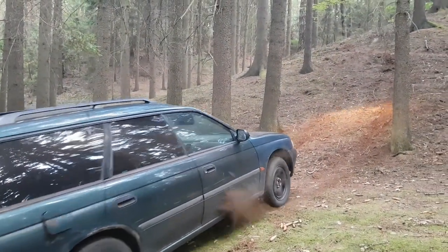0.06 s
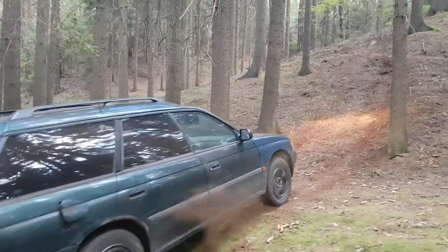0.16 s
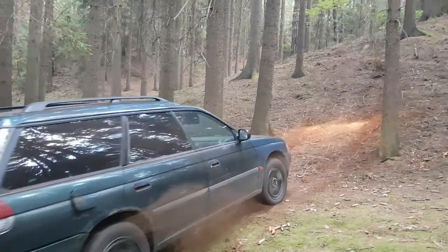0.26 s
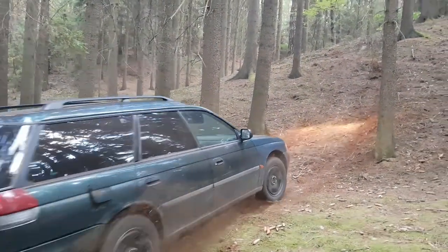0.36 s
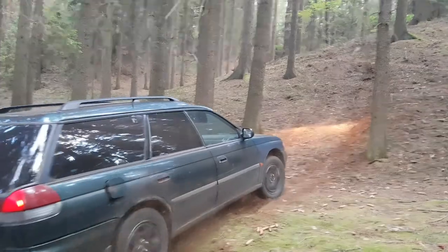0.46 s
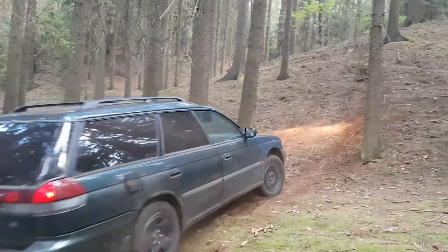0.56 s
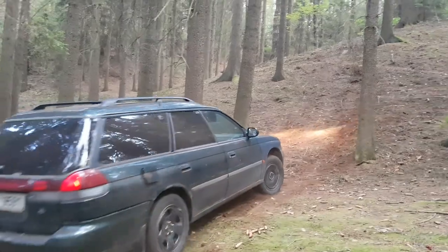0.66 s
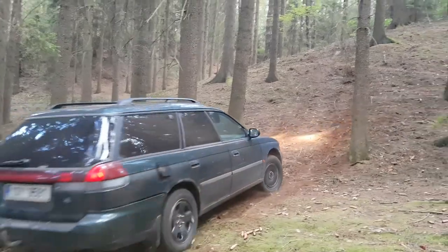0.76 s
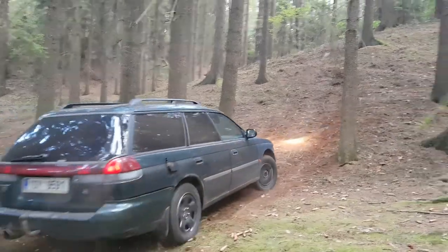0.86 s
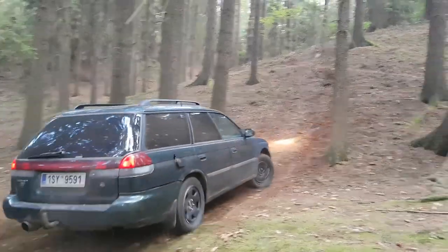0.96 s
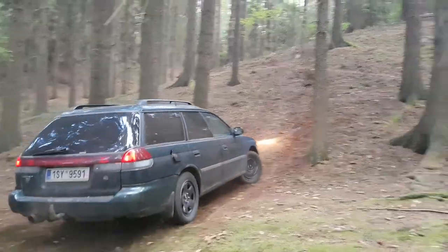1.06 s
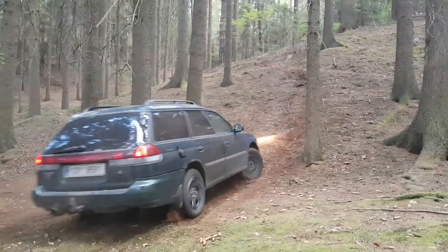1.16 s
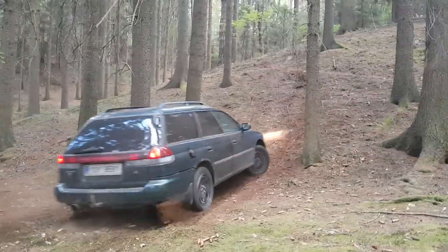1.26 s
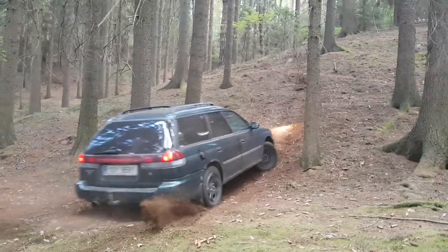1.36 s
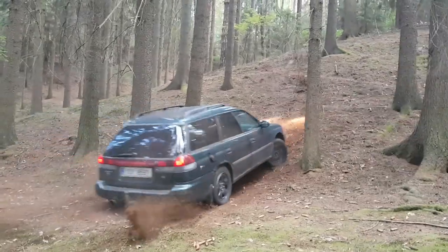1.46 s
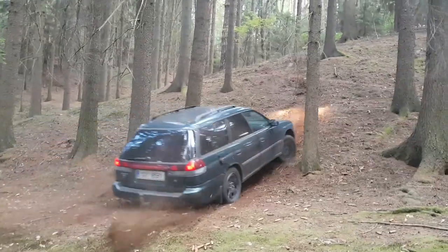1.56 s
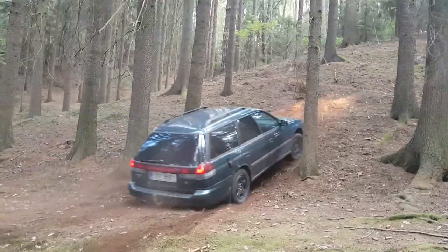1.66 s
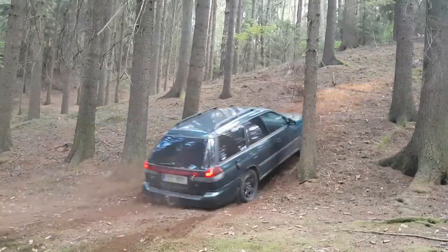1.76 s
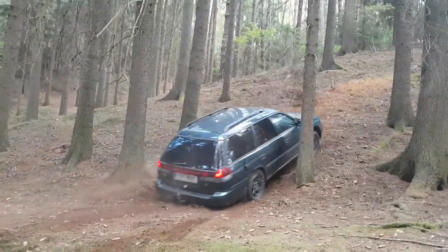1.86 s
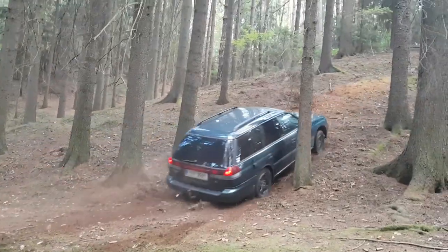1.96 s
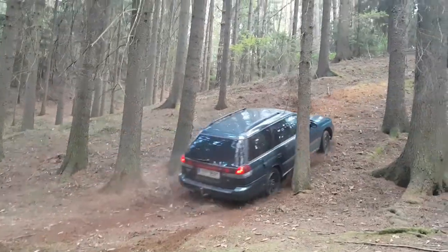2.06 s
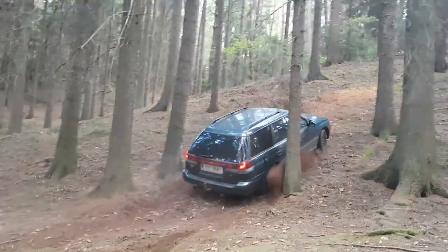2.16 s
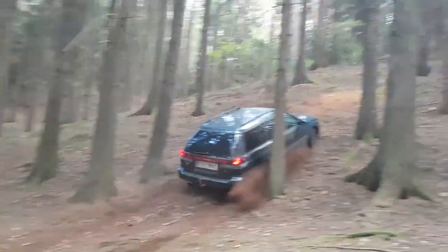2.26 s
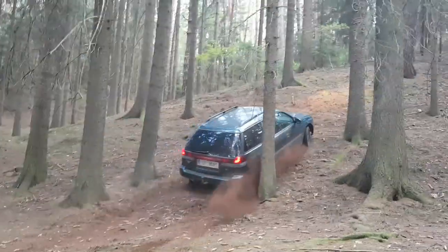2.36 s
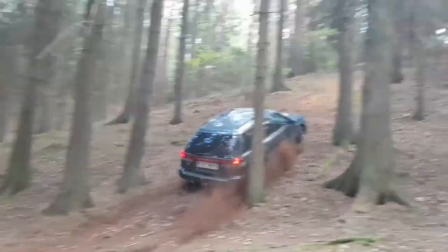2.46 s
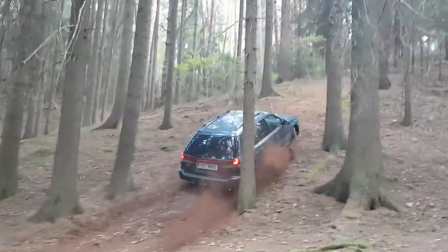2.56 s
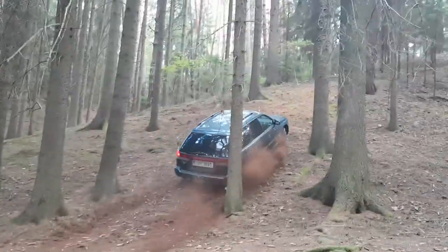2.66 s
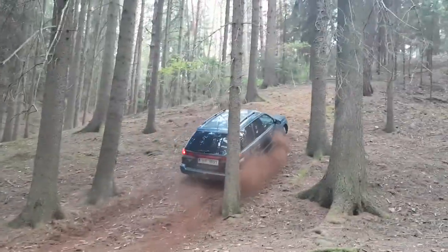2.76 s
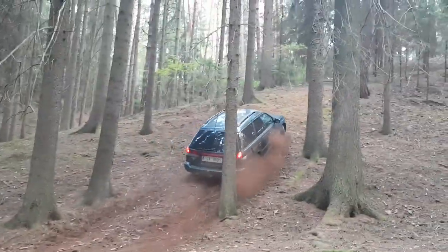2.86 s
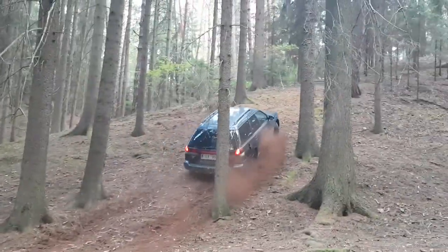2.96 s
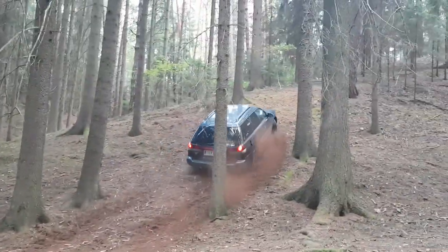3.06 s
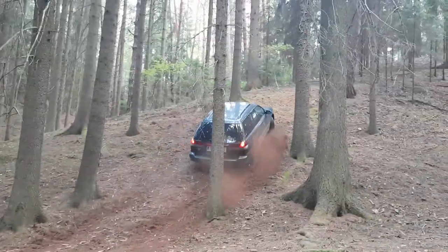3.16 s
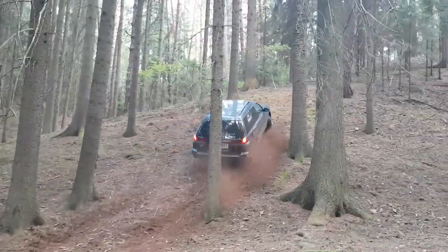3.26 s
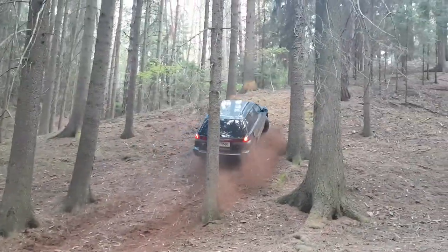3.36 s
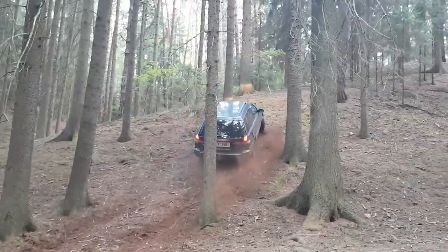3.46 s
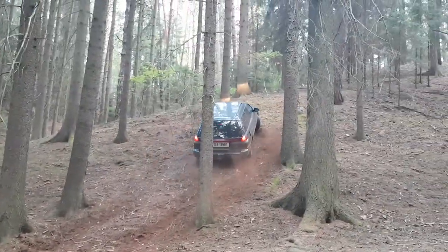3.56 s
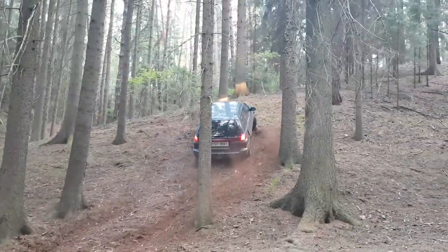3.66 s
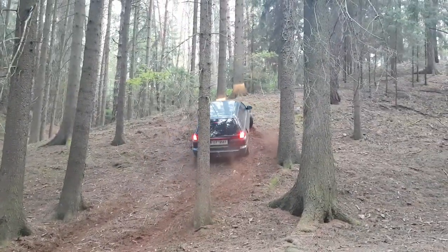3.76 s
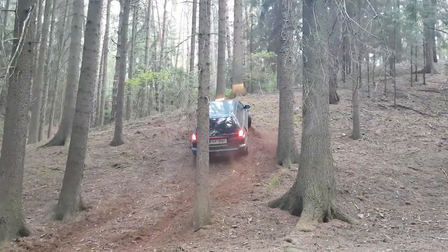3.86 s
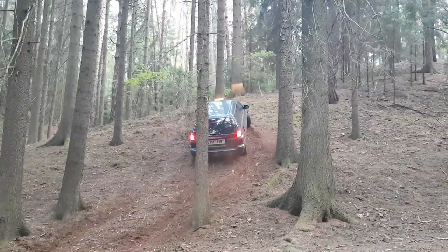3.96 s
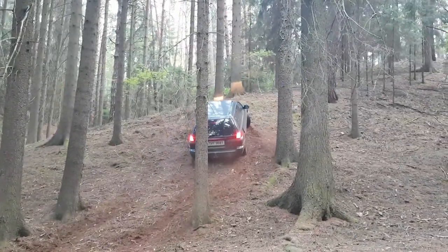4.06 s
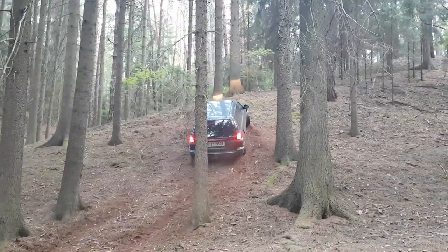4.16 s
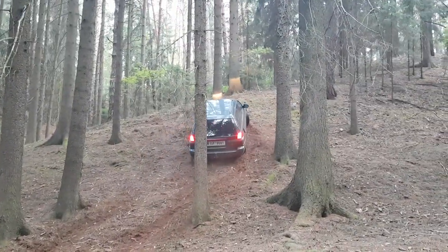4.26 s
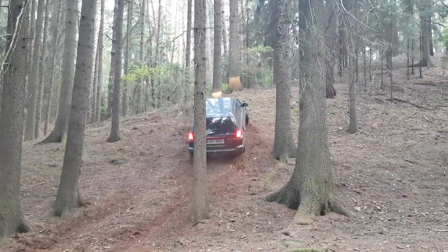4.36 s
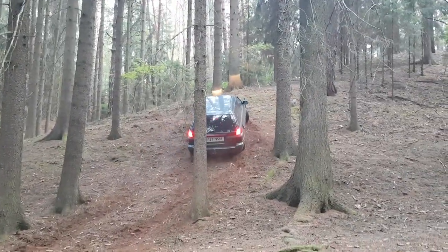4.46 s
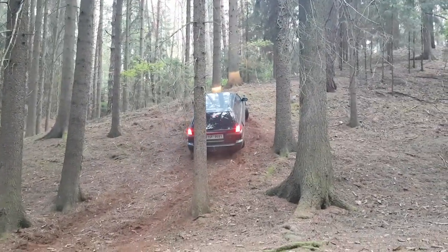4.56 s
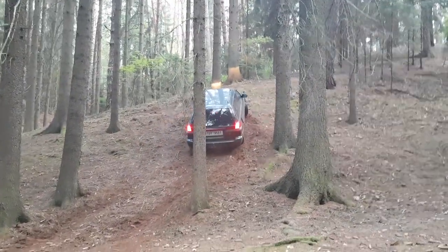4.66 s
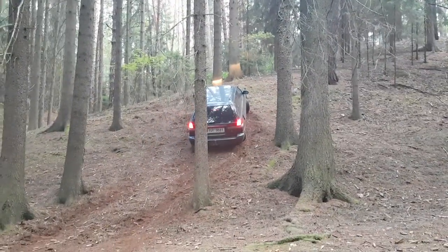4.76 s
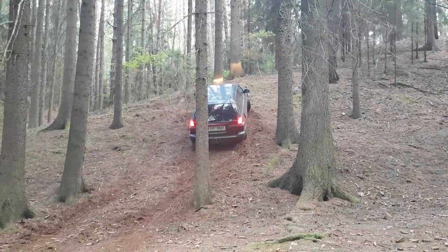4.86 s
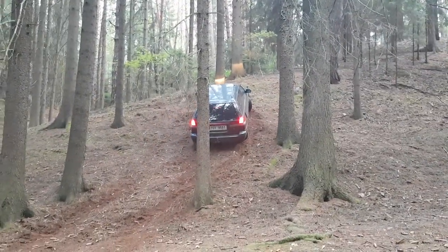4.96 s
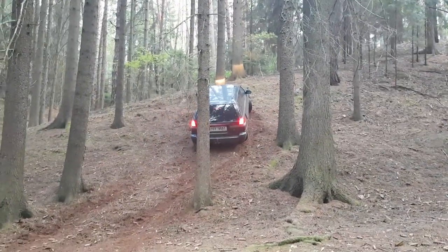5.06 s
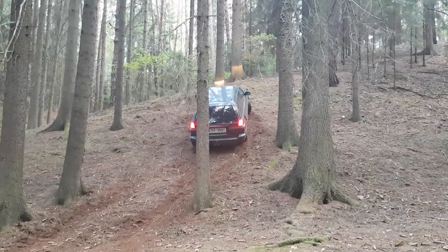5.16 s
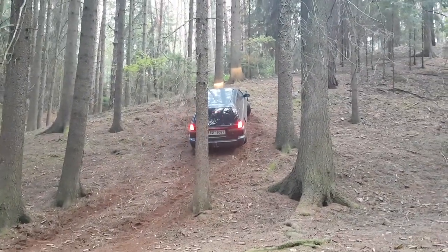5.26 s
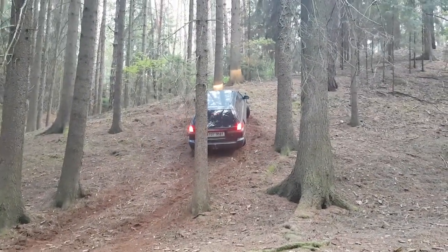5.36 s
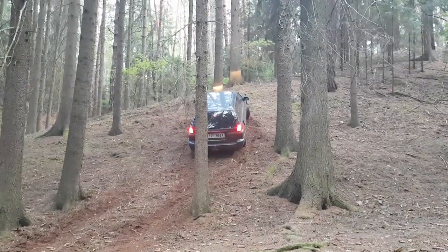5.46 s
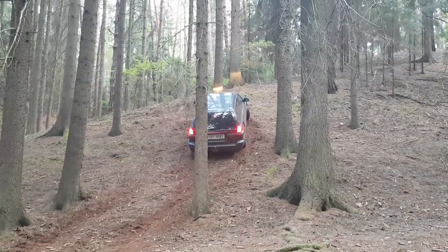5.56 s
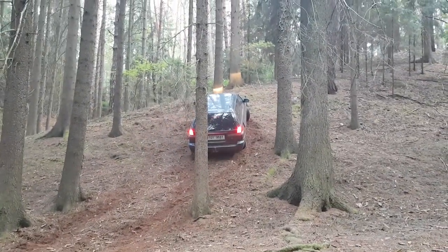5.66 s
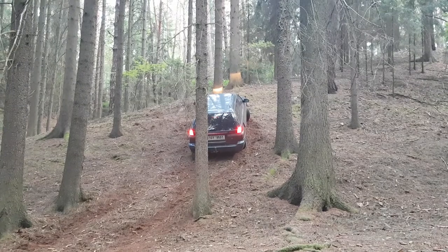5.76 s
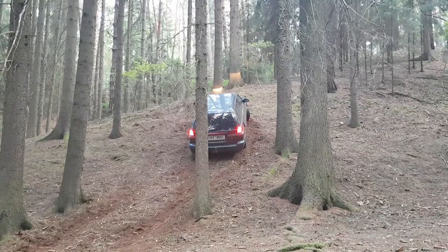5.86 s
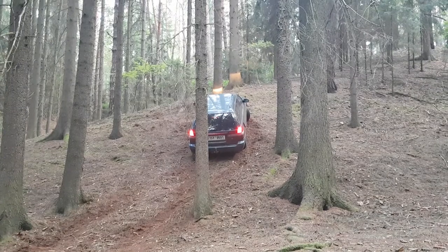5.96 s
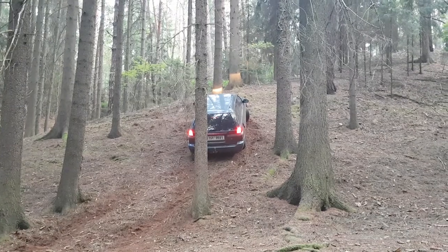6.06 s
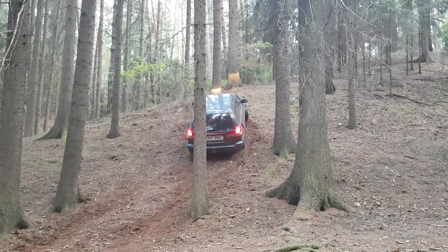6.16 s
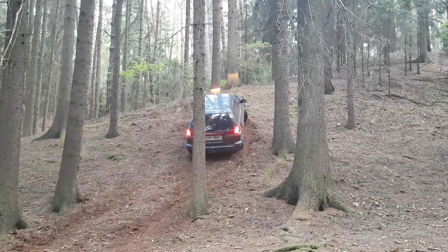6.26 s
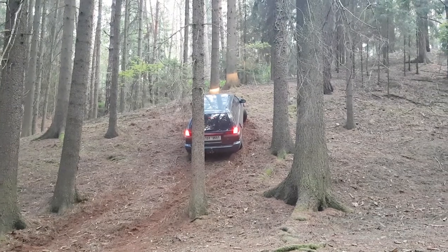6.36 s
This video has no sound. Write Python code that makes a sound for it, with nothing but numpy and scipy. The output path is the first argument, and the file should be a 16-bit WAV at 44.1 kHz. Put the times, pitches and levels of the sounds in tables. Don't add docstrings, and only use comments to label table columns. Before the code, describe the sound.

A car engine roars under load while wheels spray soil and leaves, then cuts throttle, burbles and pops down to a ragged idle in woodland.

```python
import sys
import numpy as np
from scipy import signal
from scipy.fft import rfft, irfft
from scipy.io import wavfile
from scipy.ndimage import uniform_filter1d, minimum_filter1d, map_coordinates

SR = 44100
rng = np.random.default_rng(int(sys.argv[2]) if len(sys.argv) > 2 else 0)


def volts_from_db(level):
    exponent = np.asarray(level, float) / 20
    return 10 ** exponent


def log_audio(samples):
    frames = np.atleast_2d(samples).T
    limited = np.clip(frames, -1, 1)
    pcm = np.round(limited * 32767).astype(np.int16)
    wavfile.write(sys.argv[1], SR, pcm)


N = 282681
T = np.arange(N) / SR

LIFT_S, POPS_FROM_S, DECLUTCH_S = 3.24, 3.915, 5.5
SWITCH_S = .035

# frequency in Hz, level in dB per Hz.
HISS = [(1760, -32), (3000, -1), (3900, -6.5), (5920, -10.5), (8130, -13.5), (9070, -16), (12600, -7.5),
        (15500, -10)]
# time in seconds, pitch in Hz, level in dB.
BIRD = [(6.2, 7200, -85), (6.22, 7230, -78), (6.28, 7420, -75), (6.33, 7300, -77), (6.37, 7200, -85)]
# time in seconds, level in dB, rise in seconds, fall in seconds.
TWIG = (3.6198, -12, .00007, .0012)
# time in seconds, pitch in Hz, level in dB.
SQUEAL = [(5.5, 1745, -85), (5.52, 1730, -64), (5.6, 1690, -64), (5.66, 1655, -67), (5.7, 1650, -85),
          (5.88, 1760, -85), (5.92, 1780, -68), (5.97, 1790, -85)]
# time in seconds, peak in dB, ring in Hz, 60 dB decay in seconds.
STONES = [
    (3.6199, -36, 13000, .001),
    (3.995, -30, 1150, .025),
    (3.995, -33, 2550, .022),
    (3.997, -38, 1900, .015),
    (4.008, -39, 2800, .02),
    (4.035, -38, 900, .02),
    (4.097, -46, 1750, .03),
    (4.097, -42, 1100, .02),
    (4.18, -38, 12000, .001),
    (4.535, -40, 2200, .015),
]

# time in seconds, spray level in dB, fineness of the thrown soil in dB.
WHEELS = [(0, -31.5, -1), (.08, -30.5, -0.5), (.45, -25.5, -1), (.95, -25.5, 2.5), (1.4, -25, -1.5),
          (1.6, -27.5, 5.5), (1.81, -30.5, 5), (2.02, -25.5, 3.5), (2.25, -25, -0.5), (2.55, -26.5, 1.5),
          (2.75, -28, 1.5), (3.05, -31, 2), (3.26, -37, -2), (3.55, -48.5, -0.5), (4.2, -53, -1.5),
          (5.0, -55.5, -2), (5.6, -66, -4.5), (6.41, -67.5, -0.5)]
# time in seconds, change in dB, length in
# seconds.
GRIPS = [
    (.7, -0.5, .03),
    (1.27, -3, 0.035),
    (1.42, 0, 0.038),
    (1.5, -1, .02),
    (2.07, 2.5, .07),
    (2.64, -9, .045),
    (3.13, 0, 0.025),
]
# time in seconds, change in dB, length in seconds.
TOSSES = [
    (.3, 2.5, .03),
    (1.1, 2.5, .05),
    (1.36, 1.5, .03),
    (3.42, 5.5, .02),
    (3.48, 5, .02),
    (3.77, 5, .03),
    (4.12, 7, 0.023),
    (4.18, 4.5, .02),
]
# frequency in Hz, level in dB per Hz.
SPRAY = [(530, -31), (900, -7.5), (1040, 5), (1100, -2), (1260, -3.5), (1670, -3.5), (2250, -7),
         (2510, -8.5), (2860, -9.5), (3630, -17), (5570, -22.5), (7870, -26.5), (9070, -35), (12500, -24.5),
         (15500, -32)]
# time in seconds, comb spacing in Hz.
SLOPE = [
    (2.35, 1780),
    (2.75, 1400),
    (3.0, 1220),
    (3.25, 1110),
    (6.41, 1100),
]

# frequency in Hz, level in dB.
ROAR = [(60, -39), (220, 4), (400, -11.5), (520, -8), (620, 2), (760, 3), (900, -7), (1050, -12.5),
        (1300, -11), (3000, -61)]
# frequency in Hz, level in dB.
TAILPIPE = [(60, -30.5), (250, -19.5), (340, -20), (440, -3.5), (520, -8.5), (600, 0), (670, -6.5),
            (800, -15), (1050, -15), (1300, -19.5), (3000, -57)]
# time in seconds, change in dB, length in seconds.
GULPS = [
    (.4, 5, 0.13),
    (.84, 5.5, 0.08),
    (1.08, 4.5, .15),
    (2.05, -3.5, 0.13),
    (2.35, 1, 0.071),
    (2.95, 3, 0.13),
]

# time in seconds, peak in dB, thump above the peak in dB.
POPS = [(3.262, -25, 24), (3.282, -23.5, 11), (3.912, -23, 17), (3.932, -29.5, 13), (3.957, -34, 14),
        (4.025, -33, 19), (4.045, -31.5, 13), (4.092, -23, 17.5), (4.155, -37.5, -3), (4.244, -34, 12.5),
        (4.273, -41, 8.5), (4.529, -23, 16.5), (4.545, -28, 12.5), (4.623, -38.5, 22), (4.801, -35, 12)]
# frequency in Hz, level in dB, 60 dB decay in seconds.
POP_MODES = [(609, 2, 0.043), (446, -8, .06), (1090, -21.5, 0.022)]
# frequency in Hz, level in dB, 60 dB decay in seconds.
THUMP_MODES = [(146.6, 4.5, 0.074), (97.2, -3.5, 0.21), (210, -4.5, 0.096)]

# time in seconds, firing rate in Hz.
CLIMB = [(0.0, 159.8), (0.4, 178.8), (0.59, 177.5), (0.9, 185.6), (1.5, 181.9), (1.96, 202.9), (2.1, 203.3),
         (2.46, 192.9), (2.67, 184.3), (3.22, 173.3)]
# time in seconds, firing rate in Hz.
COAST = [(3.26, 158.5), (3.38, 148), (3.59, 114.3), (3.93, 98.15), (4.66, 73.34), (5.48, 40.47),
         (5.85, 34.87), (6.41, 23.5)]
# multiple of the four-firing cycle, level in dB.
BEAT = [(1, -55), (2, -22), (3, -8), (4, -0.5), (5, -28.5), (6, -20.5), (7, -23.5), (8, -16), (9, -34),
        (10, -28), (11, -29), (12, -28.5), (13, -37.5), (14, -36), (15, -31), (16, -25), (17, -43),
        (18, -27), (19, -33), (20, -23.5), (24, -32)]
# multiple, time in seconds, change in dB, length in seconds.
SINGING = [(6, .65, 5, .15), (8, 0, 6, .05), (8, 1.9, 2, .25), (8, 2.4, -4, .15), (12, .12, 6, .1),
           (12, .58, 6, .06), (12, 1.55, 9, .15), (12, 1.95, 11, .17), (12, 2.5, -6, .2), (16, 1.0, 8, .2),
           (16, 3.15, 12, .08), (16, .3, -6, .3), (16, 2, -6, .4), (20, .1, 4, .25), (20, 1.9, -8, .6),
           (24, .33, 12, .1)]
# time in seconds, change in dB, length in seconds.
SURGES = [
    (0, 1.5, 0.035),
    (.4, -1, .06),
    (1.36, 0.5, 0.032),
    (2.6, -9.5, 0.026),
    (3.28, 3, 0.0091),
    (3.41, 1.5, 0.044),
    (3.93, -6, 0.011),
]
# time in seconds, depth in dB, length in seconds.
MISSES = [
    (2.605, -2.5, 0.011),
    (3.225, -9.5, 0.0068),
    (3.282, -19.5, 0.0044),
    (3.955, -10.5, 0.017),
    (4.117, -2.5, .01),
    (4.542, -10.5, 0.011),
    (4.836, -18.5, 0.0046),
]
# start in seconds, scatter of firing strength in dB, scatter of firing time
# from 0 to 1, level of late-burning fuel in dB.
STAGES = [
    (0, .6, .004, -40),
    (POPS_FROM_S, 1.5, .015, -11),
    (4.65, .8, .008, -27),
    (DECLUTCH_S, 2.4, .03, -15),
]
CYLINDER_DB = [2.5, 3, 0.7, -0.5]
# frequency in Hz, level in dB.
PIPE = [(15, -40), (35, -20), (46, -18), (66, -2), (90, 0), (130, -1), (143, -5), (168, -15), (192, -27),
        (230, -35), (300, -53), (440, -49), (590, -46), (800, -64), (3000, -87), (8000, -125)]
# frequency in Hz, level in dB.
BURBLE = [(40, -40), (105, -10), (135, 0), (165, -1), (215, -17), (300, -34), (380, -47), (600, -58),
          (3000, -90), (8000, -125)]
# multiple of the firing rate, level in dB.
HEADERS = [(3 / 4, -26), (3 / 2, -24), (2, -26)]

# frequency in Hz, level in dB.
SCATTER = [(60, -26), (250, -20), (600, -11), (1400, -6), (4000, -6), (8000, -3), (15000, -2)]
# time in seconds, delay in samples.
PORT_LAG = [
    (0, 14),
    (1, 8.5),
    (2.2, 1),
    (4.6, 0),
    (5.4, -2.5),
    (6.41, -2),
]
# frequency in Hz, left minus right in dB.
PORT_TILT = [(60, 1), (110, -2), (200, -1), (380, -0.5), (700, 1), (1290, 3.5), (2380, 10.5), (4400, 1.5),
             (7200, -0.5), (8000, 7.5), (8800, 3.5), (15000, 5.5)]
# time in seconds, first notch in Hz.
EDGE = [
    (0, 9730),
    (.8, 8920),
    (2.2, 5720),
    (3.2, 5400),
    (3.45, 9460),
    (6.41, 9470),
]


def curve(rows):
    s, *columns = np.transpose(rows)
    return [np.interp(T, s, c) for c in columns]


def after(s):
    return np.clip((T - s) / SWITCH_S + .5, 0, 1)


def swells(rows):
    return sum(db * np.exp(-.5 * ((T - s) / w) ** 2) for s, db, w in rows)


def walk(rate):
    k = int(SR / rate)
    held = np.repeat(rng.standard_normal(N // k + 1), k)
    return 1.3 * uniform_filter1d(uniform_filter1d(held, k), k)[:N]


def colour(x, points):
    size = 8192
    f, db = np.transpose(points)
    bins_hz = np.maximum(np.arange(size // 2 + 1) * SR / size, 1)
    cep = irfft(np.log(volts_from_db(np.interp(np.log(bins_hz), np.log(f), db))))
    cep[1:size // 2] *= 2
    cep[size // 2 + 1:] = 0
    return signal.oaconvolve(x, irfft(np.exp(rfft(cep))))[:N]


def even(x, s):
    span = int(s * SR)
    return x / np.sqrt(uniform_filter1d(uniform_filter1d(x ** 2, span), span) + 1e-12)


def band(x, lo_hz, hi_hz, order=3):
    return signal.sosfilt(signal.butter(order, [lo_hz, min(hi_hz, .45 * SR)], "band", fs=SR, output="sos"), x)


def ring(s, modes, rise_s):
    out, i = np.zeros(N), int(s * SR)
    t = T[:min(SR // 4, N - i)]
    for hz, db, t60 in modes:
        out[i:i + len(t)] += volts_from_db(db) * np.sin(2 * np.pi * hz * t) * np.exp(-np.log(1000) * t / t60)
    out[i:i + len(t)] *= 1 - np.exp(-(t / rise_s) ** 2)
    return out


def smear(x, t60):
    echo = rng.standard_normal(SR // 3) * np.exp(-np.log(1000) * T[:SR // 3] / t60)
    return signal.fftconvolve(x, echo / np.linalg.norm(echo))[:N]


def delayed(x, lag):
    return map_coordinates(x, [np.arange(N) - lag], order=3, mode="nearest")


def microphone_hiss():
    return volts_from_db(-70.5) * even(colour(rng.standard_normal(N), HISS), .5)


def whistle(rows):
    hz, db = curve(rows)
    return volts_from_db(db + 1.5 * walk(60)) * np.sin(2 * np.pi * np.cumsum(hz) / SR) * (db > -84)


def twig_snap():
    s, db, rise, fall = TWIG
    t = np.maximum(T - s, 0)
    return volts_from_db(db) * (1 - np.exp(-(t / rise) ** 2)) * np.exp(-t / fall)


def struck_stones():
    return sum(ring(s, [(hz, db, t60)], 8 / SR) for s, db, hz, t60 in STONES)


def soil_layers(throttle):
    spin_db, fine_db = curve(WHEELS)
    bite_db, toss_db = swells(GRIPS), swells(TOSSES)
    settled = 1 - np.exp(-np.maximum(T - LIFT_S, 0) / .1)
    spray_db = spin_db + bite_db
    grit_db = spin_db - 14 + fine_db + toss_db + bite_db - 2 * settled
    leaf_db = spin_db - 24 + 1.4 * fine_db + .7 * toss_db + 1.9 * bite_db - 5 * settled
    leaf_db = leaf_db - 0.7 * np.minimum(T, LIFT_S)
    clods_db = (.3 + .6 * throttle) * walk(18)
    return [(volts_from_db(db + clods_db + (0.94 + 0.24 * throttle) * walk(14)), lo, hi)
            for db, lo, hi in ((spray_db, 1050, 4000), (grit_db, 4000, 9000), (leaf_db, 9000, 17000))]


def thrown_soil(layers, beat, throttle):
    steady = 1 + (.1 + .6 * throttle) * (beat - 1)
    grains = (rng.random(N) < .05) * rng.standard_normal(N) * volts_from_db(3.4 * rng.exponential(size=N))
    wash = rng.standard_normal(N) * steady
    soil = colour(grains / grains.std() * 0.94 + wash, SPRAY)
    return sum(gain * even(band(soil, lo, hi), 0.04) for gain, lo, hi in layers)


def mirrored(x):
    turned = after(2.33)
    dull = signal.sosfiltfilt(signal.butter(2, [1500, 5500], "band", fs=SR, output="sos"), x)
    flank = .3 * (1 - turned) * np.interp(T - 1 / 1250, T, dull)
    slope_gain = .5 * turned * (1 - .5 * after(LIFT_S))
    return x + flank + slope_gain * np.interp(T - 1 / curve(SLOPE)[0], T, dull)


def gas_gain(beat, throttle):
    since = np.maximum(T - LIFT_S, 0)
    ebb_db = -42 - 5.5 * since + 15 * np.exp(-since / .3) - 3.3 * after(DECLUTCH_S)
    roar_db = throttle * (-29 + swells(GULPS)) + (1 - throttle) * ebb_db
    return volts_from_db(roar_db + 0.5 + 0.69 * walk(12.0)) * beat


def gas_noise(gain, throttle):
    noise = rng.standard_normal(N)
    loaded_gas = throttle * even(colour(noise, ROAR), 0.24)
    return gain * (loaded_gas + (1 - throttle) * even(colour(noise, TAILPIPE), 0.24))


def roar_and_soil(firings, throttle):
    beat = 1 + (0.2 + 0.35 * throttle) * np.cos(2 * np.pi * firings)
    beat = beat + 0.24 * throttle * np.cos(2 * np.pi * firings / 4)
    layers, gain = soil_layers(throttle), gas_gain(beat, throttle)
    return [gas_noise(gain, throttle) + thrown_soil(layers, beat, throttle) for _ in range(3)]


def afterfire():
    out = np.zeros(N)
    for s, db, up_db in POPS:
        thump = volts_from_db(up_db) * ring(s, THUMP_MODES, 0.009)
        out += volts_from_db(db + 5.0) * (ring(s, POP_MODES, 0.0025) + thump)
    return out


def body_rumble(low_db):
    return volts_from_db(low_db - 22) * even(band(rng.standard_normal(N), 71, 210), 0.24)


def exhaust_db(hz, throttle):
    idle = after(DECLUTCH_S)
    load = -9.5 - .05 * (hz - 180)
    coast = np.maximum(-8.5 + 6.5 * np.log2(hz / 100), -13.5)
    dying = -24 - 13.5 * (T - DECLUTCH_S) - 200 * np.maximum(T - 6.37, 0)
    shut = (1 - idle) * coast + idle * dying
    return throttle * load + (1 - throttle) * shut + swells(SURGES)


def loaded(firings, low_db):
    second_db = -19 - 3 * T + walk(7)
    low, high = 0, 0
    for k, db in BEAT:
        blur_db = (.6 + .09 * k) * walk(12)
        blur_phase = .003 * k * (k + 6) * walk(40)
        tone = volts_from_db(blur_db) * np.sin(2 * np.pi * k * firings / 4 + 0.63 * k + blur_phase)
        if k < 6:
            low = low + volts_from_db(db) * tone
        else:
            level_db = {8: second_db, 12: -35}.get(k, low_db + db)
            high = high + volts_from_db(level_db + swells(row[1:] for row in SINGING if row[0] == k)) * tone
    return volts_from_db(low_db) * even(low, 0.2) + high


def coasting(firings, hz, scatter_db, jitter, burble_db, low_db):
    at = np.flatnonzero(np.diff(np.floor(firings)))
    strength, lateness, burn_time, burn_size = rng.standard_normal((len(at), 4)).T
    period = SR / hz[at]
    puffs, burns = np.zeros((2, N))
    puff_at = np.clip(at + (jitter[at] * lateness * period).astype(int), 0, N - 1)
    puffs[puff_at] = volts_from_db(np.resize(CYLINDER_DB, len(at)) + scatter_db[at] * strength)
    burns[np.clip(at + (burn_time * period).astype(int), 0, N - 1)] = burn_size
    sound = even(colour(puffs, PIPE), 0.087) + volts_from_db(burble_db) * even(colour(burns, BURBLE), 0.13)
    blur = volts_from_db(-12 + np.clip(44 - hz, 0, 4)) * smear(sound, .16)
    return volts_from_db(low_db) * even(sound + blur, .1)


def header_tones(firings):
    falling = after(LIFT_S + SWITCH_S) - after(POPS_FROM_S)
    return sum(falling * volts_from_db(db + 1.8 * walk(9.6)) * np.sin(2 * np.pi * k * firings) for k, db in HEADERS)


def tailpipe_ring(firings, hz, throttle):
    out = 0
    for k in range(4, 7):
        tuned = volts_from_db(-32 - 22 * (T - LIFT_S)) / (1 + ((k * hz - 585) / 45) ** 2)
        out = out + (1 - throttle) * tuned * np.sin(2 * np.pi * k * firings)
    return out


def exhaust(firings, hz, throttle, low_db):
    start, *held = np.transpose(STAGES)
    stage = np.searchsorted(start, T, "right") - 1
    roughness = [uniform_filter1d(v[stage], int(2 * SWITCH_S * SR)) for v in held]
    pulses = throttle * loaded(firings, low_db)
    pulses = pulses + (1 - throttle) * coasting(firings, hz, *roughness, low_db)
    pulses = pulses + header_tones(firings) + tailpipe_ring(firings, hz, throttle)
    return pulses * volts_from_db(swells(MISSES))


def scene():
    hz = curve(list(CLIMB) + list(COAST))[0]
    firings = np.cumsum(hz) / SR
    throttle = 1 - after(LIFT_S)
    low_db = exhaust_db(hz, throttle)
    small_sounds = whistle(BIRD) + twig_snap() + whistle(SQUEAL) + struck_stones()
    near, *returned = roar_and_soil(firings, throttle)
    engine = small_sounds + afterfire() + body_rumble(low_db) + exhaust(firings, hz, throttle, low_db)
    direct = engine + volts_from_db(-0.59) * mirrored(near)
    lagged = delayed(direct, curve(PORT_LAG)[0])
    out = []
    for side, x, wash in zip((1, -1), (direct, lagged), returned):
        heard = x + colour(volts_from_db(-5) * smear(engine, .2) + wash, SCATTER)
        if side > 0:
            treble = signal.sosfiltfilt(signal.butter(2, 3500, "high", fs=SR, output="sos"), heard)
            heard = heard - .6 * delayed(treble, SR / curve(EDGE)[0])
        tilt = [(f, side * db / 2) for f, db in PORT_TILT]
        out.append(colour(heard, tilt) + microphone_hiss())
    return np.array(out)


def roll_off(x):
    return signal.sosfilt(signal.butter(12, 15660, fs=SR, output="sos"), x)


def record(dry):
    span = int(.012 * SR)
    peak = np.abs(dry).max(axis=0) + 1e-9
    room = minimum_filter1d(np.minimum(1, .93 / peak), 2 * span)
    return roll_off(dry * uniform_filter1d(room, span))


dry = scene()
out = record(dry)
log_audio(out)
```